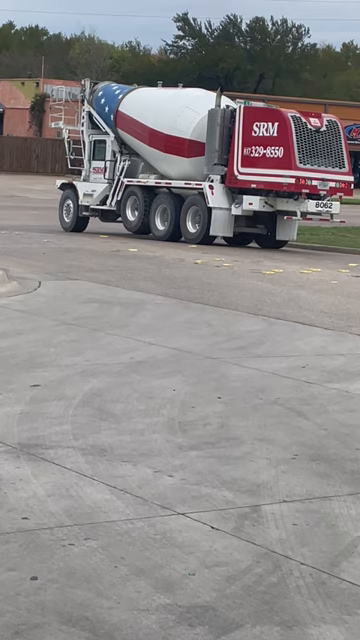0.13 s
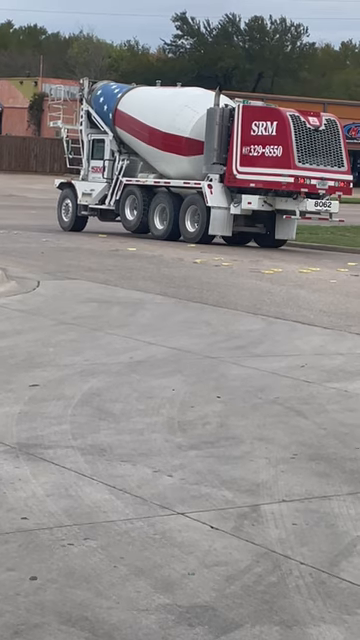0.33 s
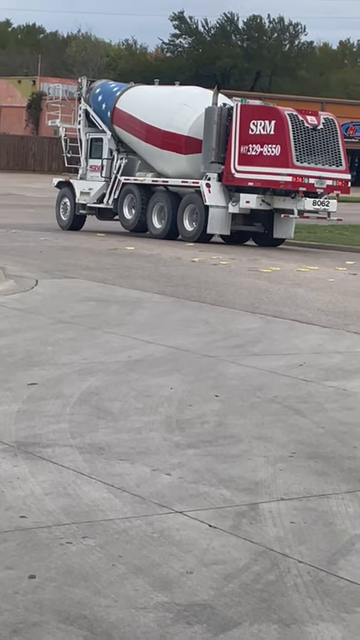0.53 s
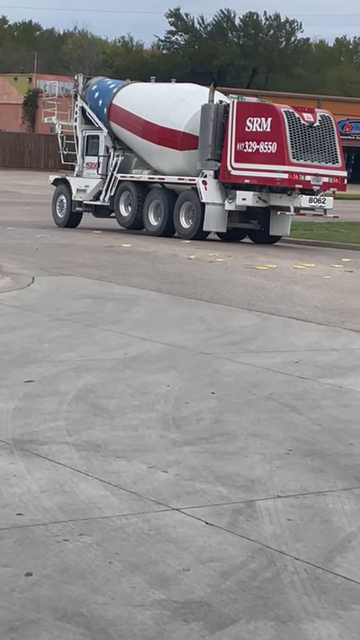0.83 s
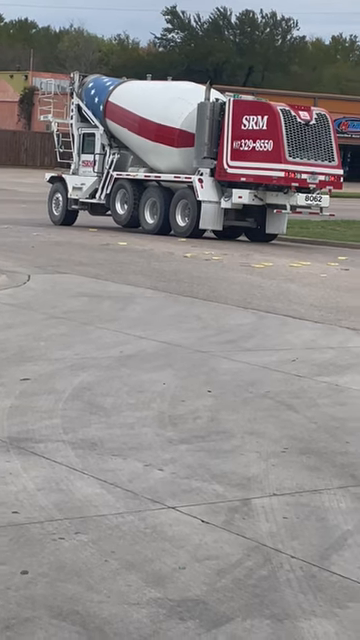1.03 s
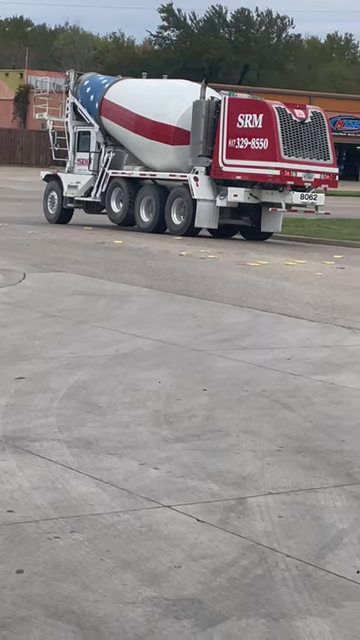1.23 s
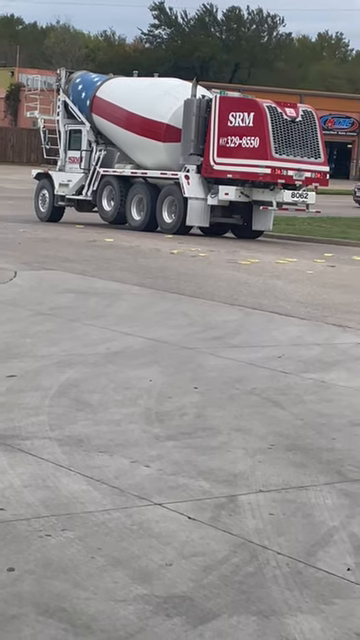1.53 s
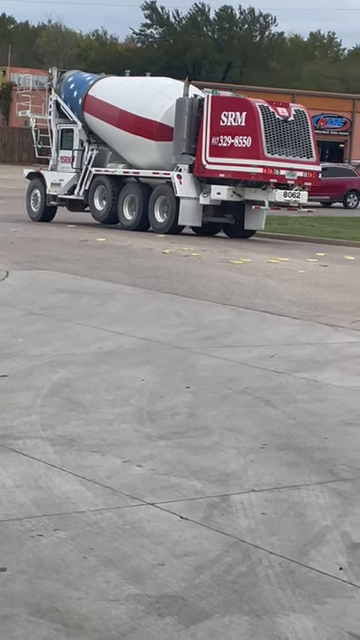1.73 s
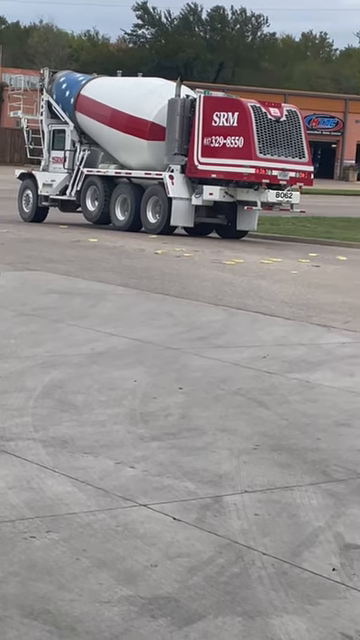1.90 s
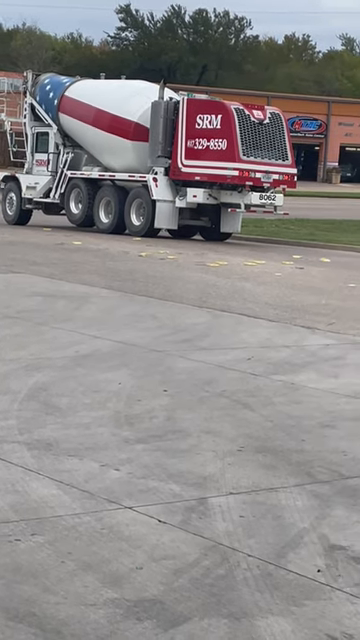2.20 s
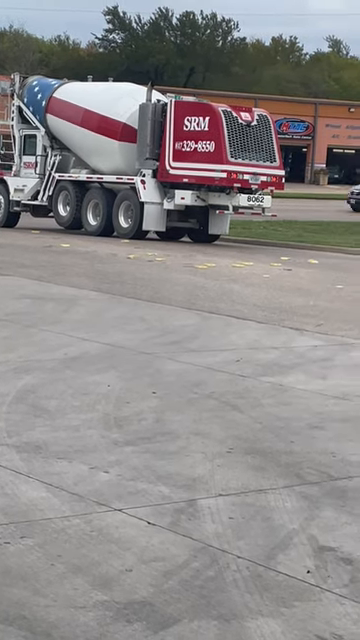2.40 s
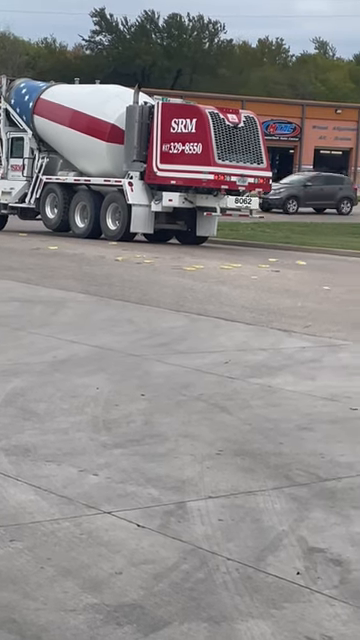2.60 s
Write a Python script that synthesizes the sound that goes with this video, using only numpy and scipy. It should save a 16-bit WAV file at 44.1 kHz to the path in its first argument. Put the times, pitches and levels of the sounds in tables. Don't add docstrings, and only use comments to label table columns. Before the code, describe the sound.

A heavy diesel truck engine hums and roars steadily near idle outdoors, a thin brake squeal fading at the start, a loose metal panel rattling in fits, and low wind thumps on the microphone.

```python
import sys
import numpy as np
from scipy import signal
from scipy.fft import rfft, irfft
from scipy.io import wavfile
from scipy.ndimage import uniform_filter1d

SR = 44100
rng = np.random.default_rng(int(sys.argv[2]) if len(sys.argv) > 2 else 0)


def persist_wave(psi):
    counts = np.round(np.clip(psi, -1, 1) * 32767).astype(np.int16)
    wavfile.write(sys.argv[1], SR, np.atleast_2d(counts).T)


def boost(x):
    u = np.asarray(x, float) / 20
    return 10 ** u


N = 121275
T = np.arange(N) / SR


def white():
    return rng.standard_normal(N)


def evened(x):
    return x / np.sqrt(np.mean(x ** 2) + 1e-20)


def along(table, order=1):
    rows = np.array(table)
    return np.interp(T, rows[:, 0], rows[:, order])


def read(points, hz):
    f, value = np.transpose(points)
    return np.interp(np.log(hz + 1), np.log(f + 1), value)


def coloured(x, gain):
    return irfft(rfft(x) * gain(np.fft.rfftfreq(N, 1 / SR)), N)


def wander(rate_hz):
    return evened(coloured(white(), lambda f: (f > 0) * np.exp(-(f / rate_hz) ** 2)))


def resonate(x, hz, width):
    turn = np.exp(2j * np.pi * np.cumsum(hz * np.ones(N)) / SR)
    r = np.exp(-np.pi * width / SR)
    return 2 * (turn * signal.lfilter([1 - r], [1, -r], x / turn)).real


def resonate_twice(x, hz, width, second_width):
    return evened(resonate(resonate(x, hz, width), hz, second_width))


def band_noise(low_hz, high_hz, length):
    band = signal.butter(2, [low_hz, high_hz], "band", fs=SR, output="sos")
    return signal.sosfilt(band, rng.standard_normal(length))


# (time [s], pitch [Hz], level [dB])
HUM = [(0, 228.2, -32), (.26, 228.3, -30), (.42, 228.8, -33), (.75, 233.9, -32.5), (.97, 232.4, -34),
       (1.27, 228.8, -32.5), (1.6, 228.4, -33.5), (1.9, 229.4, -31.5), (2.3, 234.8, -33),
       (2.5, 233.4, -33.5), (2.66, 232, -33), (2.75, 233, -31)]
# (pitch [times firing rate], level under hum [dB])
WEAKER_ORDERS = [(4.7, -13), (5.5, -14), (7.5, -8), (12, -17), (30.6, -15)]
HUM_ORDER = 6.5


def hum():
    turns, hz = firings(), along(HUM)
    tones = np.sin(2 * np.pi * HUM_ORDER * turns) * boost(0.8 * wander(36))
    for order, db in WEAKER_ORDERS:
        level = boost(db + 2.5 * wander(9))
        cycles = order * turns + rng.random() + .12 * wander(8)
        tones = tones + level * np.sin(2 * np.pi * cycles)
    fuzz = resonate_twice(white(), hz, 18, 18)
    return boost(along(HUM, order=2)) * (np.sqrt(2) * tones + boost(-11) * fuzz)


def firings():
    known_firing_s = 2.355
    turns = np.cumsum(along(HUM) / HUM_ORDER) / SR
    return turns - turns[round(known_firing_s * SR)]


def since_firing():
    return (firings() % 1) * HUM_ORDER / along(HUM)


def firing_strength(spread_db):
    strengths = boost(spread_db * rng.standard_normal(400))
    return strengths[np.floor(firings()).astype(int) + 200]


# (pitch [Hz], level [dB per Hz])
ROAR_COLOUR = [(60, -8), (300, -8.5), (1500, -17), (2200, -24.5), (3800, -26.5), (4900, -34), (8000, -39),
               (15800, -59.5)]
# (time [s], level [dB])
LOAD = [(0.0, -32.5), (0.21, -33.5), (0.6, -33), (1.13, -32.5), (1.6, -33), (1.95, -34), (2.35, -32.5),
        (2.75, -32.5)]
KNOCK_DEPTH, KNOCK_S, KNOCK_FROM_HZ, PATCH_DB = 0.37, 0.0059, 370, 1


def roar():
    frames = N // 128 + 5
    a, b, patches = rng.standard_normal((frames, 257, 3)).T
    patches = uniform_filter1d(patches, size=6, axis=0)
    patches = evened(uniform_filter1d(patches, size=24, axis=1))
    noise = signal.istft((a + 1j * b) * boost(PATCH_DB * patches), nperseg=512, noverlap=384)[1][:N]
    knock = KNOCK_DEPTH * firing_strength(3.8) * np.exp(-since_firing() / KNOCK_S) * noise
    noise = noise + coloured(
        knock, lambda f: f ** 2 / (f ** 2 + KNOCK_FROM_HZ ** 2) / (1 + (f / 6500) ** 2))
    out = coloured(noise, lambda f: boost(read(ROAR_COLOUR, f)) * f ** 4 / (f ** 4 + 45 ** 4))
    middle = coloured(out, lambda f: (f > 400) * (f < 3000))
    return boost(along(LOAD)) * out / middle.std()


# (time [s], level [dB])
RATTLE = [(0, -57), (.6, -57), (.8, -46.5), (.98, -49), (1.15, -50.5), (1.3, -53), (1.42, -47.5),
          (1.53, -46.5), (1.59, -60), (1.85, -54), (1.97, -45), (2.04, -60), (2.16, -48), (2.22, -43),
          (2.38, -42.5), (2.5, -43.5), (2.58, -50), (2.75, -48)]
# (pitch [Hz], width [Hz], level [dB], growth with the rattle [dB per dB])
PANEL = [(3565, 45, -1, 1.1), (3420, 90, 1, 1.4), (4130, 160, -5, 2.4), (5945, 80, -12, 2.5),
         (6870, 110, -13, 2.4), (10250, 400, -19, 2.4)]
RATTLE_TOP_DB = -43


def rattle():
    jolts = firing_strength(2.8) * (np.exp(-since_firing() / .005) + .25) * white()
    under_db = rattle_under_db()
    ticks = evened(coloured(jolts, lambda f: f / (f + 2500) / (1 + (f / 6000) ** 2)))
    out = boost(-6 + 2.2 * under_db) * ticks
    for hz, width, db, steep in PANEL:
        out = out + boost(db + steep * under_db) * resonate_twice(jolts, hz, width, 6 * width)
    return boost(RATTLE_TOP_DB) * out


def rattle_under_db():
    return along(RATTLE) - RATTLE_TOP_DB


# (time [s], low ring [dB], high ring [dB], tick [dB])
KNOCKS = [(0.6664, -49, -56, -62), (0.7362, -43, -58, -61), (0.8046, -41, -59, -64), (0.826, -40, -62, -60),
          (0.8949, -36, -56, -55), (0.9457, -56, -58, -56), (1.0051, -42, -57, -60),
          (1.1024, -39, -45, -64), (1.1204, -42, -57, -62), (1.1433, -37, -48, -61),
          (1.1563, -37, -48, -60), (1.2111, -45, -49, -61), (1.3867, -38, -59, -59),
          (1.4167, -44, -59, -63), (1.4461, -38, -56, -63), (1.4744, -39, -49, -61),
          (1.5025, -34, -44, -62), (1.5314, -33, -51, -63), (1.8741, -41, -46, -53),
          (1.9096, -38, -45, -54), (1.9305, -48, -50, -55), (1.9619, -34, -44, -55),
          (1.9909, -46, -54, -53), (2.157, -38, -60, -55), (2.1934, -45, -43, -57), (2.2139, -53, -44, -59),
          (2.2293, -39, -41, -57), (2.2444, -35, -45, -60), (2.2732, -32, -52, -57),
          (2.2992, -29.5, -61, -59), (2.3291, -30, -48, -58), (2.3555, -31, -37, -50),
          (2.384, -30, -39, -50), (2.4134, -42, -41, -48), (2.4414, -44, -43, -44.5),
          (2.4603, -34, -44, -53), (2.4984, -43, -37, -53), (2.5237, -40, -52, -56),
          (2.6349, -43, -52, -61), (2.6643, -36, -54, -59), (2.7043, -42, -47, -63),
          (2.7307, -44, -56, -59)]
# (low ring [dB], high ring [dB], tick [dB])
KNOCK_FLOORS = (-43, -55, -60)
LOW_RING_HZ, LOW_RING_S, LOW_RING_DB = 3565, .075, -1
HIGH_RING_HZ, HIGH_RING_S, HIGH_RING_DB = 5945, .065, 1.5
TICK_S, TICK_LIFT_DB = 0.0055, 11.5


def knocks():
    t, swells = np.arange(4000) / SR, np.zeros((3, N + 4000))
    for s, *dbs in KNOCKS:
        power = boost(np.array(dbs)) ** 2 - boost(np.array(KNOCK_FLOORS)) ** 2
        low, high, tick = np.sqrt(np.maximum(power, 0))
        blow = [low * boost(LOW_RING_DB - 60 * t / LOW_RING_S),
                high * boost(HIGH_RING_DB - 60 * t / HIGH_RING_S),
                tick * boost(TICK_LIFT_DB) * np.exp(-t / TICK_S)]
        start = round(s * SR)
        swells[:, start:start + 4000] += blow * np.minimum(t / .0025, 1)
    under_db = rattle_under_db()
    low = swells[0, :N] + boost(-45 + .4 * under_db + 3 * wander(45))
    high = swells[1, :N] + boost(-55 + 2.2 * under_db + 4 * wander(45))
    low = low * np.sin(2 * np.pi * (LOW_RING_HZ * T + .2 * wander(25)))
    high = high * np.sin(2 * np.pi * (HIGH_RING_HZ * T + .3 * wander(35)))
    return low + high + swells[2, :N] * band_noise(7800, 13200, N)


# (time [s], crack [dB], side ring [dB])
SCRAPES = [(1.103, -35, -50), (1.214, -42, -44), (1.505, -43, -44), (1.965, -43, -44), (2.13, -46, -40),
           (2.24, -43, -43), (2.273, -42, -44), (2.3, -42, -42), (2.356, -41, -41), (2.385, -37, -37),
           (2.416, -42, -42), (2.468, -42, -43), (2.495, -42, -42)]
SIDE_RING_HZ, SIDE_RING_S, CRACK_S = 4150, .04, .0025


def scrapes():
    t, out = np.arange(3000) / SR, np.zeros(N + 3000)
    for s, crack_db, ring_db in SCRAPES:
        crack = 2 * boost(crack_db) * np.exp(-t / CRACK_S) * band_noise(3200, 7000, 3000)
        ring = np.sin(2 * np.pi * SIDE_RING_HZ * rng.uniform(.98, 1.02) * t)
        ring = boost(ring_db - 60 * t / SIDE_RING_S) * ring
        out[round(s * SR):][:3000] += np.minimum(t / .001, 1) * (crack + ring)
    whine = resonate_twice(white(), 3565, 60, 180)
    return out[:N] + boost(-56 + .45 * rattle_under_db()) * whine


# (pitch [Hz], level [dB], glide [Hz per s], column of the grip table)
SQUEAL = [(9350, -47, 0, 1), (8775, -47.5, 480, 2), (8630, -57, 0, 1), (14530, -66, 0, 2)]
# (time [s], upper tone level [dB], lower tone level [dB])
GRIP = [(0, -3, -4), (.015, -1, -6), (.032, -7, -4), (.05, 0, -3), (.076, 3, -2), (.105, 0, 1),
        (.117, -14, 1), (.125, -7, 0), (.137, -18, -1), (.149, -8, -14), (.16, -16, -9), (.17, -10, 1),
        (.182, -13, -9), (.21, -18, -20), (.25, -30, -24), (.32, -60, -60)]


def squeal():
    out = np.zeros(N)
    for hz, db, glide, column in SQUEAL:
        level = boost(db + .8 * wander(30) + along(GRIP, order=column))
        cycles = hz * T + glide * T ** 2 / 2 + 0.08 * wander(40)
        out += np.sqrt(2) * level * np.sin(2 * np.pi * cycles)
    return out


# (time [s], level [dB], length [s], tyre roar pitch [Hz])
CARS = [
    (1.024, -38.5, 0.33, 1065),
    (2.53, -32.5, 0.084, 1120),
]
CAR_WIDTH_HZ = 1500


def cars():
    out = np.zeros(N)
    for s, db, length, hz in CARS:
        tyres = resonate_twice(white(), hz, CAR_WIDTH_HZ, CAR_WIDTH_HZ)
        out += boost(db + 2.5 * wander(9.9)) * tyres / (1 + ((T - s) / length) ** 2)
    return out


# (pitch [Hz], lead of the left [radians])
PORTS = [(2050, 0.), (2500, .9), (4400, .8), (5000, 0.), (7500, 3.14), (11050, 6.28), (14100, 9.42),
         (16000, 11.)]
DIFFUSE_DB, LEFT_DB = -28, -1.5


def ports(x):
    def lead(f):
        return np.exp(.5j * np.interp(f, *np.transpose(PORTS)))

    scatter = signal.oaconvolve(x, evened(rng.standard_normal(900)) / 30)[:N] * boost(DIFFUSE_DB)
    scatter = coloured(scatter, lambda f: boost(3 / (1 + (2600 / (f + 1)) ** 6)))
    left = coloured(x, lambda f: lead(f) * boost(LEFT_DB / (1 + (f / 700) ** 4)))
    right = coloured(x, lambda f: 1 / lead(f))
    return np.array([left + scatter, right - scatter])


# (time [s], level [dB])
WIND = [(0, -19), (.1, -42), (.3, -34), (.45, -39), (.54, -28.5), (.66, -41), (.97, -43), (1.14, -26),
        (1.3, -59), (1.55, -28), (1.8, -53), (2.0, -28), (2.25, -32), (2.45, -43), (2.58, -50),
        (2.68, -28.5), (2.75, -29)]
# (pitch [Hz], level [dB per Hz])
WIND_COLOUR = [(12, -41.5), (20, 1), (81, 0.5), (192, -5.5), (229, -3), (343, -11), (500, -1), (650, -33),
               (1100, -120)]
# (time [s], level [dB], length [s], pitch [Hz])
BUFFETS = [(.542, -16.5, .018, 165), (.536, -23, .014, 260), (1.567, -17, .022, 118),
           (1.562, -18, .026, 270), (1.570, -24, .010, 430), (2.290, -25, .035, 66), (2.47, -28, .05, 62),
           (.26, -21.5, .04, 228), (2.715, -23, .05, 240), (.095, -26, .04, 72), (.2, -27, .06, 75),
           (1.43, -30, .04, 70), (2.6, -28, .08, 56), (2.2, -28, .06, 58), (2.37, -28, .05, 58),
           (1.572, -26, .016, 370), (1.573, -28, .012, 550), (2.55, -28, .04, 115)]
WIND_LUMP_DB, WIND_APART_DB, APART_HZ = 2.5, -54.5, 233
SIDE_GUST_S, SIDE_GUST_LENGTH_S, SIDE_GUST_DB, SIDE_GUST_HZ = 0.5, 0.086, -29, 218


def wind():
    def colour(f):
        return boost(read(WIND_COLOUR, f)) * f ** 4 / (f ** 4 + 47 ** 4) / (1 + (f / 260) ** 4)

    level = boost(along(WIND) + WIND_LUMP_DB * wander(0.97))
    shared = level * evened(coloured(white(), colour))
    for s, db, length, hz in BUFFETS:
        shake = np.cos(2 * np.pi * hz * (T - s) + .5 * wander(29))
        shared = shared + boost(db) * np.exp(-(2 * (T - s) / length) ** 4) * shake
    apart = evened(coloured(white(), lambda f: f ** 2 / (1 + (f / APART_HZ) ** 4)))
    apart = apart * (boost(WIND_APART_DB + wander(7.6)) + 0.03 * level)
    gust = evened(coloured(white(), lambda f: f ** 2 / (1 + (f / SIDE_GUST_HZ) ** 5)))
    swell = np.exp(-((T - SIDE_GUST_S) / SIDE_GUST_LENGTH_S) ** 2)
    apart = apart + gust * boost(SIDE_GUST_DB) * swell
    return np.array([shared + apart, shared - apart])


def scene():
    truck = hum() + roar() + boost(-5.5) * rattle() + knocks() + scrapes() + squeal()
    return ports(truck + cars()) + wind()


def top_cut(x):
    return signal.sosfilt(signal.butter(12, 15780, fs=SR, output="sos"), x)


def record(dry):
    return top_cut(dry)


dry = scene()
out = record(dry)
persist_wave(out)
```